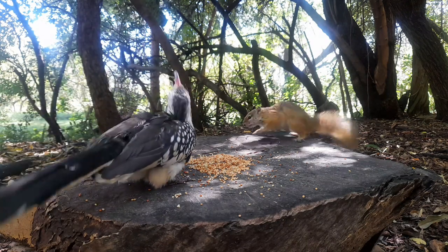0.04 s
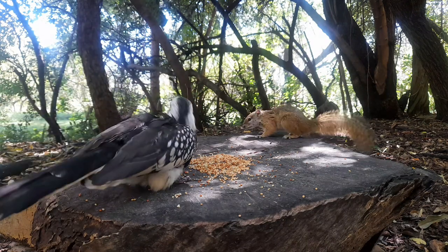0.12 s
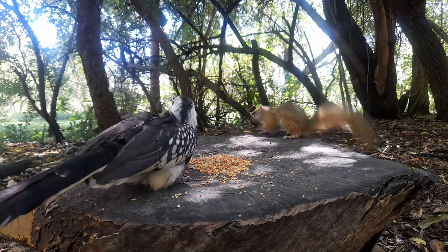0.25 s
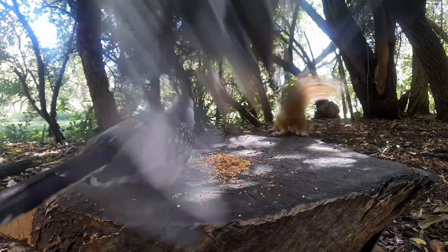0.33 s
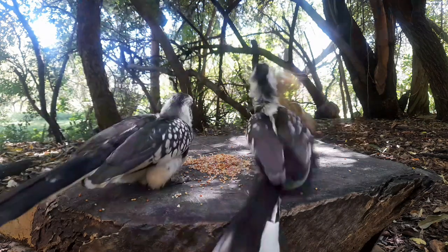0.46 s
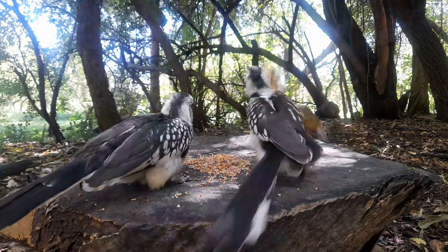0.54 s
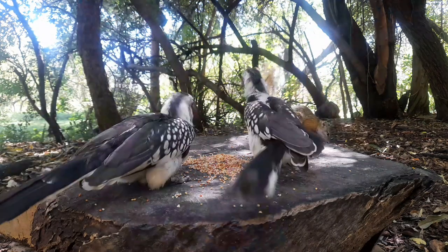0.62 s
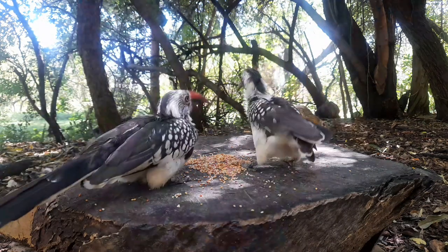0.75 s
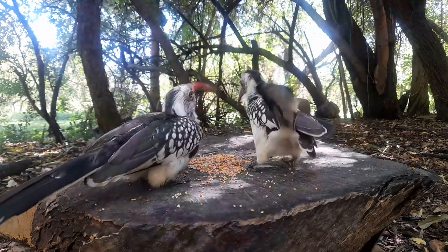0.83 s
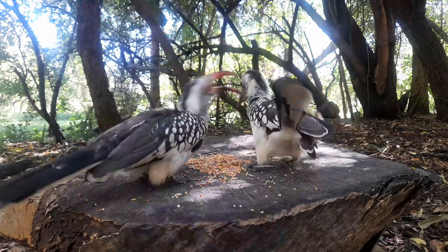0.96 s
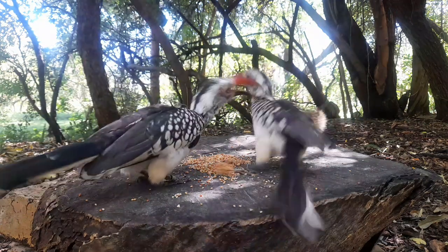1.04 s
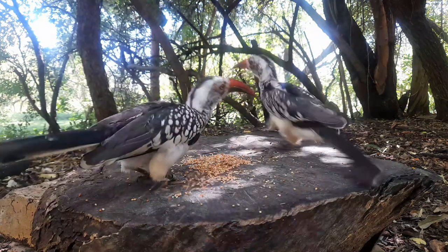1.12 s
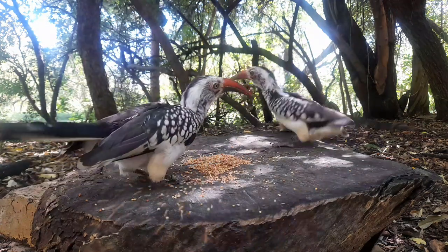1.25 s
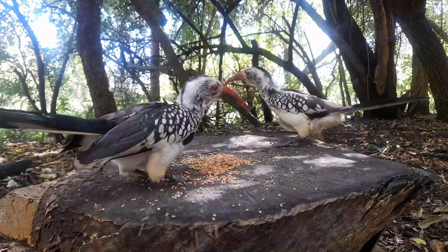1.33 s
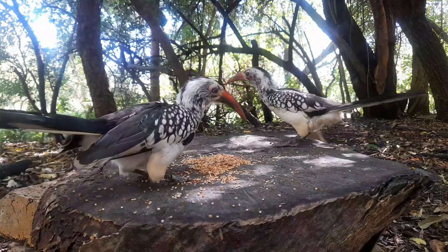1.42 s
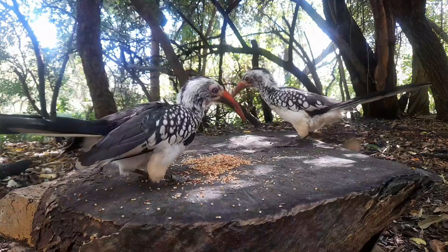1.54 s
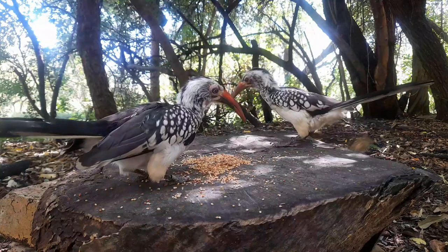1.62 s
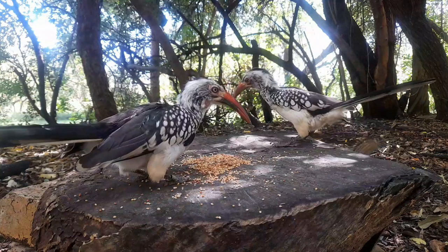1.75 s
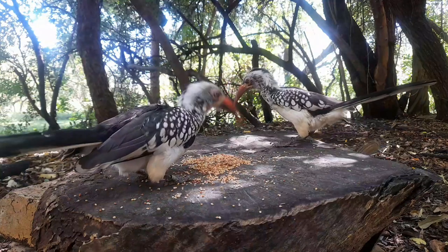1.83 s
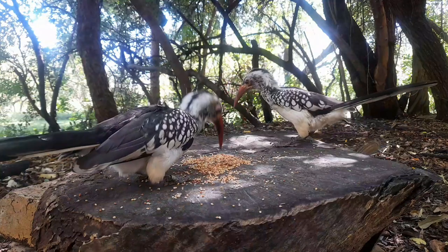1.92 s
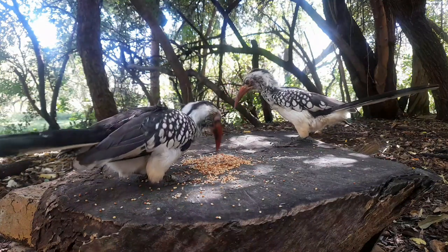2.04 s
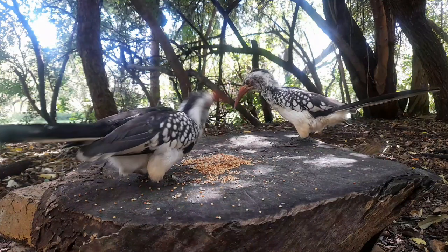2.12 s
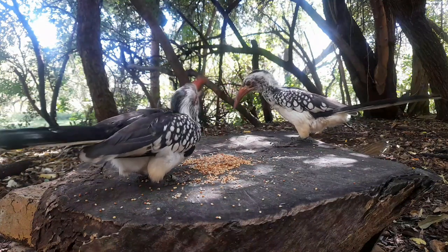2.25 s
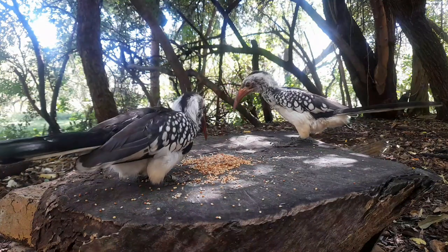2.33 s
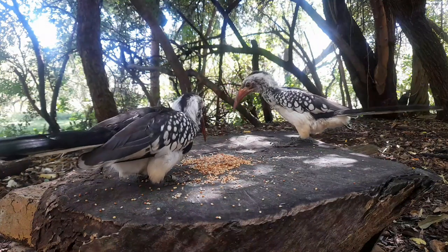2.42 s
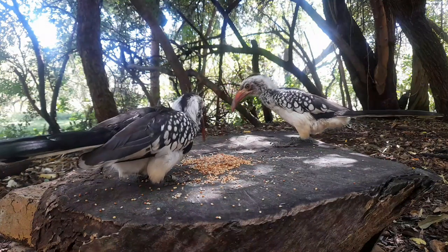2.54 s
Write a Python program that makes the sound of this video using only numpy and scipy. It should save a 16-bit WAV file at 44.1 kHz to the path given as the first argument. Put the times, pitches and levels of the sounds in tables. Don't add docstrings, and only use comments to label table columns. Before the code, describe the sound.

Rushing wingbeats and air thumps, a knock of feet on wood, low throaty bird clucks, light ticking

```python
import sys
import numpy as np
from scipy import signal
from scipy.fft import rfft, irfft
from scipy.io import wavfile
from scipy.ndimage import uniform_filter1d

SR = 44100
rng = np.random.default_rng(int(sys.argv[2]) if len(sys.argv) > 2 else 0)


def gain_from_db(level_db):
    decades = np.asarray(level_db, float) / 20
    return 10 ** decades


def file_out(sig):
    cols = np.atleast_2d(sig).T
    lim = np.clip(cols, -1, 1)
    pcm = np.round(lim * 32767).astype(np.int16)
    wavfile.write(sys.argv[1], SR, pcm)


N = 114660
T = np.arange(N) / SR

# frequency in Hz, likeness from 0 to 1.
LIKENESS = [(60, 0.83), (500, 0.077), (2000, 0.057), (12000, 0.019)]
# frequency in Hz, level in dB per Hz.
FLOOR_COLOUR = [(200, -15.5), (600, -4), (2500, -18), (16000, -18.5)]
# time in seconds, level in dB.
DRONE_SWELL = [(.84, -72), (.89, -50.5), (1.02, -51.5), (1.43, -49), (1.62, -54), (1.7, -58), (1.81, -67),
               (1.95, -64), (2.28, -62.5), (2.44, -56), (2.6, -52)]
# frequency in Hz, level in dB per Hz.
RUMBLE_COLOUR = [(25, -37.5), (62, -7), (100, -1), (135, -21), (300, -20), (500, -50)]
# start in seconds, peak in dB, pitch in Hz.
TICKS = [(.42, -40, 1500), (.5325, -38, 3000), (.621, -52, 5700), (.7865, -50, 5500), (1.1095, -50, 4300),
         (1.1345, -46, 5000), (1.1598, -35, 6000), (1.2095, -48, 4000), (1.2475, -55, 4300),
         (1.316, -59, 6000), (1.3535, -56, 7450), (1.432, -52, 6300), (1.439, -56, 6300),
         (1.4755, -59, 12000), (1.482, -60, 4500), (1.488, -54, 3600), (1.4962, -41, 8000),
         (1.511, -61, 6000), (1.5422, -49, 12500), (1.543, -54, 5000), (1.551, -60, 14000),
         (1.555, -53, 12600), (1.556, -58, 5000), (1.567, -61, 7500), (1.592, -58, 12600),
         (1.604, -59, 11000), (1.62, -60, 11000), (1.629, -57, 13000), (1.6315, -62, 13000),
         (1.6388, -48, 5700), (1.681, -60, 12000), (1.685, -63, 13000), (1.7065, -53, 12000),
         (1.7085, -60, 7000), (1.722, -60, 5500), (1.725, -61, 11000), (1.736, -57, 10700),
         (1.74, -62, 9000)]
# time of peak in seconds, peak in dB, rise in seconds,
# fall in seconds, level of the dull part in dB.
SCUFFS = [(0.026, -52.5, 0.0063, .008, 5), (.145, -59.5, 0.0029, 0.042, 15), (0.23, -53.5, .003, .015, 5),
          (0.257, -45.5, .004, 0.088, 2.5), (0.435, -34, 0.0097, 0.068, -0.5),
          (0.46, -30.5, 0.0051, 0.0019, 6), (0.472, -38, 0.0035, 0.01, 1), (0.533, -53, 0.0013, 0.009, 13),
          (0.789, -74, 0.18, 0.33, -8), (0.923, -73.5, 0.026, 0.13, 0), (1.067, -53.5, 0.026, 0.062, -5.5),
          (1.0891, -32.5, 0.011, 0.0091, 1), (1.101, -42, 0.015, 0.0047, -6), (1.11, -62, 0.0068, 0.2, -1),
          (1.136, -50.5, 0.0036, 0.0055, 2.5), (1.156, -48.5, 0.0019, 0.011, -6),
          (1.165, -44, 0.0076, 0.025, -22), (1.195, -64, 0.033, 0.034, 2), (1.213, -54, 0.004, 0.017, 0),
          (1.26, -67, 0.05, 0.061, 2), (1.435, -62.5, 0.0027, 0.013, -5), (1.513, -71.5, 0.027, 0.024, -17),
          (1.528, -65.5, 0.79, 0.31, -3.5), (2.069, -79.5, .008, 0.027, 6), (2.3, -80, 0.038, 0.18, -5)]
# frequency in Hz, level in dB per Hz.
SCUFF_COLOUR = [(600, -6.5), (1200, -13.5), (2200, -10), (16000, -23)]
# start in seconds, peak in dB, pitch scale as a ratio.
KNOCKS = [
    (.4575, -25, 1.01),
    (1.0888, -26, .72),
]
# frequency in Hz, level in dB, 60 dB decay in seconds.
STUMP_MODES = [(280, -10, .035), (500, -2, .028), (950, -6, .012), (1900, -5, .007), (2900, -4, .005),
               (7000, -3, .004)]
# start in seconds, length in seconds, level in dB, opening pitch in Hz,
# top pitch in Hz.
CLUCKS = [(.416, 0.05, -40, 614, 730), (.506, 0.053, -40, 609, 753), (0.639, 0.042, -43.5, 617.5, 657),
          (0.936, 0.041, -45, 641, 793), (1.028, 0.04, -45, 667, 760), (1.115, 0.039, -42, 597, 906),
          (1.194, 0.048, -41, 587, 835), (1.313, 0.038, -47, 660, 700)]
# place of the pitch top as a share of length, overtones in dB,
# rasp from 0 to 1, opening scoop as a share of pitch.
CLUCK_BREAKS = [(.75, -2, 0.7, 0.14), (0.55, -2.5, 0.23, 0.24), (0.83, -6, 0.2, 0.038),
                (0.57, -9.5, 0, 0.015), (0.605, 3.5, 0.53, 0.0072), (0.513, -11, 0.6, 0.031),
                (0.72, -7.5, 0.43, 0.25), (0.45, -10, 0.7, .01)]
# start in seconds, length
# in seconds, level in dB, opening pitch in Hz, top pitch in Hz.
ANSWERS = [
    (.37, 0.052, -38.5, 527, 597),
    (.535, 0.043, -43.5, 410, 554),
    (.625, 0.039, -46, 436, 513),
    (1.396, 0.049, -43.5, 416, 524),
    (2.02, 0.039, -66.5, 1098, 906),
    (2.054, 0.015, -72.5, 920, 980),
    (2.083, 0.017, -83, 880, 905),
]
# place of the pitch top as a share of length, overtones in dB,
# rasp from 0 to 1, opening scoop as a share of pitch.
ANSWER_BREAKS = [(0.65, -6, 0.32, 0.086), (0.456, 4, 0.13, 0.0033), (0.55, 2.5, 0.13, 0.02),
                 (0.32, -1.5, 0.31, 0.0088), (0.7, -21, .2, 0.015), (0.72, -18, .5, .01),
                 (0.93, -17.5, .5, 0.011)]
# climb curve as a power, end sag as a share of pitch, swell as a share of length,
# overtone loss after the top in dB, level loss after the top in dB.
HIGH_VOICE = (5.0, .32, .35, -20, -7)
LOW_VOICE = (1.3, .32, .35, -9, -9)
# frequency in Hz, level in dB.
THROAT = [(400, -9), (600, 0), (950, -2), (1235, -4), (1340, -21), (2000, -25), (2700, -35), (3500, -47)]
# time in seconds, level in dB.
RUSH = [(0, -57), (.1, -55.5), (.15, -54.5), (.2, -49), (.27, -47), (.35, -47), (.42, -53.5), (.55, -59),
        (.72, -75.5)]
# frequency in Hz, level in dB per Hz.
FEATHER_COLOUR = [(250, -20), (400, 0.5), (570, -2.5), (1100, -10), (1600, -14.5), (2800, -14.5),
                  (16000, -22)]
# time in seconds, peak in dB, length in
# seconds, pitch in Hz.
CLAPS = [(0.028, -36.5, 0.0056, 530), (.118, -47, 0.0082, 475), (0.145, -38.5, 0.0077, 517),
         (.185, -45.5, 0.0064, 740), (0.231, -43.5, 0.0085, 510), (.267, -33, 0.011, 559),
         (0.283, -35.5, 0.011, 473), (0.343, -35.5, 0.011, 282)]
# time in seconds, peak in dB, length in seconds, pitch in Hz,
# left over right in dB.
PUFFS = [(0.042, -45.5, 0.02, 73.5, -6), (0.149, -45.5, 0.047, 72, -2), (0.221, -37.5, 0.1, 56.5, 0.5),
         (0.291, -32, 0.023, 76.6, 0), (0.326, -33.5, 0.044, 64.3, -1), (0.37, -25, 0.021, 85, 18),
         (.42, -35.5, 0.027, 215, 33), (.437, -27.5, 0.051, 120.6, 31), (0.449, -22, 0.0074, 215, 24),
         (0.463, -25, 0.049, 74, 44), (0.508, -34, 0.02, 100, 28), (0.553, -33, 0.051, 100.2, 24.5),
         (0.6, -33.5, 0.0098, 124, 27), (0.643, -33, 0.02, 81, 12), (0.708, -49, 0.14, 69, -7.5),
         (0.772, -48.5, 0.045, 109, 16), (.915, -43, 0.082, 63, -38), (1.1, -45, 0.019, 105, 3),
         (0.488, -36.5, .03, 148.6, 20)]
# time in seconds, level in dB, left over right in dB.
BUFFET = [(0, -63, 1), (.3, -41.5, -0.5), (.46, -45.5, 11), (.6, -59, 13), (.8, -70.5, 2), (1.05, -81, 0)]
# low edge in Hz, high edge in Hz.
BUFFET_HZ = (48.5, 240.7)
# frequency in Hz, level in dB.
MIC = [(3500, 0.5), (5600, 5), (8200, -2), (12500, 6), (15500, 7.5)]

FLOOR_DB = -80
DRONE_HZ, DRONE_OCTAVE_DB, DRONE_WOBBLE_DB, DRONE_LEFT_DB = 96.2, -24.5, 0.5, -2
RUMBLE_DB, RUMBLE_FOLLOWS = -64, 0.57
TICK_CYCLES, TICK_SNAP_DB, TICK_DB, TICK_LEFT_DB = 4.0, 3, 0, 3
DULL_BELOW_HZ = 5100
ATTACK_S, SCOOP_S = .006, .008
BREATHY_DB, JITTER, SHIMMER_DB = -27, .013, 1.5
ECHO_S, ECHO_DB = .021, -27
CUTOFF_HZ = 15950


def rms_one(x):
    return x / np.sqrt(np.mean(x ** 2) + 1e-20)


def in_time(rows):
    s, *columns = np.transpose(rows)
    return [np.interp(T, s, column) for column in columns]


def at_hz(points, hz):
    point_hz, db = np.array(points).T[:2]
    return np.interp(np.log(hz), np.log(point_hz), db)


def pan(left_db):
    return 2 * np.array([gain_from_db(left_db), np.ones_like(left_db)]) / (1 + gain_from_db(left_db))


def split_band(x, order, edge_hz, kind):
    return signal.sosfilt(signal.butter(order, edge_hz, kind, fs=SR, output="sos"), x)


def drift(rate):
    r = np.exp(-80 * np.pi * rate / SR)
    steps = rng.standard_normal(N // 40 + 2002)
    slow = signal.lfilter([1], [1, -2 * r, r * r], steps)[2000:]
    return np.interp(np.arange(N) / 40, np.arange(len(slow)), rms_one(slow))


def ring(x, hz, t60):
    r, w = gain_from_db(-60 / (t60 * SR)), 2 * np.pi * hz / SR
    return signal.lfilter([0, np.sin(w)], [1, -2 * r * np.cos(w), r * r], x + 1e-18)


def pulse(s, length, hz):
    t = T - s
    return np.exp(-8 * (t / length) ** 2) * np.cos(2 * np.pi * hz * t * (1 - 4 * t.clip(-.1, .1)))


def banded(spectrum, patchy_db, rate, grain_db, count=20):
    out, together = 0, drift(rate)
    edges = 25 * 2 ** (np.arange(count) / 2)
    grain = gain_from_db(grain_db * np.minimum(rng.exponential(1, N), 4))
    white = rng.standard_normal((2, 2, N)) * grain
    for k, (low, high) in enumerate(zip(edges, edges[1:])):
        mid, side = split_band(white[k % 2], 2, [low, high], "band")
        hz = np.sqrt(low * high)
        alike = np.clip(at_hz(LIKENESS, hz), 0, 1)
        inside = hz > .8 * spectrum[0][0]
        level = inside * gain_from_db(at_hz(spectrum, hz) + patchy_db * (.5 * together + drift(rate)))
        stereo = np.sqrt(1 + alike) * mid + np.sqrt(1 - alike) * side * [[1], [-1]]
        out = out + level * stereo
    return rms_one(out)


def woodland_floor():
    return gain_from_db(FLOOR_DB) * banded(FLOOR_COLOUR, patchy_db=.5, rate=4, grain_db=0)


def drone():
    db, = in_time(DRONE_SWELL)
    turn = 2 * np.pi * np.cumsum(DRONE_HZ + 0.68 * drift(1.68)) / SR
    wave = np.sin(turn) + gain_from_db(DRONE_OCTAVE_DB) * np.sin(2 * turn)
    tone = gain_from_db(db - 1.0 + DRONE_WOBBLE_DB * drift(26)) * wave
    rumble = banded(RUMBLE_COLOUR, patchy_db=0.92, rate=2.6, grain_db=0, count=10)
    motor = tone + gain_from_db(RUMBLE_DB + RUMBLE_FOLLOWS * (db + 59.0)) * rumble
    return pan(DRONE_LEFT_DB)[:, None] * motor


def ticks():
    out, noise = np.zeros((2, N)), rng.standard_normal((40, 400))
    for k, (s, db, hz) in enumerate(TICKS):
        snap = noise[k] * np.exp(-np.arange(400) / 25)
        body = ring(np.diff(snap, prepend=0), hz, TICK_CYCLES / hz)
        edge = np.diff(snap, 2, prepend=[0, 0]) / 6
        tick = body / np.abs(body).max() + gain_from_db(TICK_SNAP_DB) * edge
        tick = tick / np.abs(tick).max()
        place = pan(TICK_LEFT_DB * (1 + noise[k, -1]))[:, None]
        i = int(s * SR)
        out[:, i:i + 400] += gain_from_db(db + TICK_DB) * place * tick
    return out


def scuffs():
    levels = []
    for s, db, rise, fall, _ in SCUFFS:
        away = np.where(T < s, (s - T) / rise, (T - s) / fall).clip(0, 8)
        levels.append(gain_from_db(db - 26.7 * away))
    levels = np.array(levels)
    grit = banded(SCUFF_COLOUR, patchy_db=2, rate=60, grain_db=4)
    dull = split_band(grit, 3, DULL_BELOW_HZ, "low")
    bright = split_band(grit, 3, DULL_BELOW_HZ, "high")
    dull_gains = gain_from_db(np.array(SCUFFS)[:, 4])
    return levels.sum(0) * bright + dull_gains @ levels * dull


def knocks():
    out = np.zeros(N)
    for s, db, scale in KNOCKS:
        blow = rng.standard_normal(4000) * np.exp(-np.arange(4000) / 1.2)
        blow[0] += 5.0
        hit = sum(gain_from_db(mode_db) * ring(blow, hz * scale, t60) for hz, mode_db, t60 in STUMP_MODES)
        i = int(s * SR)
        out[i:i + 4000] += gain_from_db(db) * hit / np.abs(hit).max()
    return out


def clucks(rows, breaks, habit):
    out, breath = np.zeros(N), ring(rng.standard_normal(N), 900, .0012)
    waver = drift(90), drift(120), drift(250), drift(250)
    curve, sag, swell_at, overtone_loss_db, loss_db = habit
    for (s, length, db, open_hz, top_hz), (top_at, overtone_db, rasp, scoop) in zip(rows, breaks):
        i, t = int(s * SR), np.arange(int(length * SR)) / SR
        here = slice(i, i + len(t))
        u = t / length
        wobble, shimmer, *grit = [w[here] for w in waver]
        top_at = np.clip(top_at, .2, .95)

        climb = open_hz + (top_hz - open_hz) * (u / top_at) ** curve
        fall = top_hz * (1 - sag * (u - top_at) / (1 - top_at))
        hz = uniform_filter1d(np.where(u < top_at, climb, fall), size=120)
        hz = hz * (1 + JITTER * wobble - scoop * np.exp(-t / SCOOP_S))
        turn = 2 * np.pi * np.cumsum(hz) / SR

        attack = np.sin(np.pi / 2 * np.minimum(t / ATTACK_S, 1)) ** 2
        swell = np.sin(np.pi * np.interp(u, [0, swell_at, 1], [.25, .5, 1])) ** 1.3
        shape = attack * swell
        late = np.interp(u, [top_at - .2, top_at + 0.089], [0, 1])

        overtones = 0
        for k in range(2, 6):
            rough = 1 + rasp * (k - 1) * grit[k % 2]
            overtones = overtones + gain_from_db(at_hz(THROAT, k * hz)) * rough * np.sin(k * turn)
        voice = gain_from_db(at_hz(THROAT, hz)) * np.sin(turn)
        voice = voice + gain_from_db(overtone_db + overtone_loss_db * late) * shape * overtones
        voice = voice + gain_from_db(BREATHY_DB) * rms_one(breath[here])
        out[here] += gain_from_db(db + 4 + loss_db * late + SHIMMER_DB * shimmer) * shape * voice
    return out


def wings():
    feathers = banded(FEATHER_COLOUR, patchy_db=1.8, rate=30, grain_db=4)
    rush = gain_from_db(in_time(RUSH)[0]) * (T < .75) * feathers
    claps = sum(gain_from_db(db) * pulse(s, length, hz) for s, db, length, hz in CLAPS)
    puffs = 0
    for s, db, length, hz, left_db in PUFFS:
        puffs = puffs + gain_from_db(db) * pan(left_db)[:, None] * pulse(s, length, hz)
    db, left_db = in_time(BUFFET)
    air = rms_one(split_band(rng.standard_normal((2, N)), 2, BUFFET_HZ, "band"))
    buffeting = gain_from_db(db + 3.45 * drift(19.7)) * (T < 1.1) * pan(left_db) * air
    return rush + claps + puffs + buffeting


def scene():
    voices = clucks(CLUCKS, CLUCK_BREAKS, HIGH_VOICE) + clucks(ANSWERS, ANSWER_BREAKS, LOW_VOICE)
    near = voices + knocks()
    lag = int(ECHO_S * SR)
    echo = gain_from_db(ECHO_DB) * np.array([np.roll(near, lag), -np.roll(near, 2 * lag)])
    return woodland_floor() + drone() + ticks() + scuffs() + near + echo + wings()


def low_pass(x):
    return signal.sosfilt(signal.butter(12, 16680, fs=SR, output="sos"), x)


def record(dry):
    hz = np.fft.rfftfreq(2 * N, 1 / SR) + 1
    response = gain_from_db(at_hz(MIC, hz)) * (hz < CUTOFF_HZ)
    mix = irfft(rfft(dry, 2 * N) * response)[:, :N]
    return low_pass(mix)


dry = scene()
out = record(dry)
file_out(out)
```